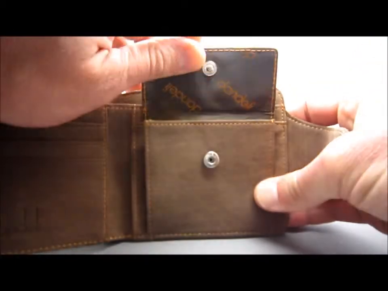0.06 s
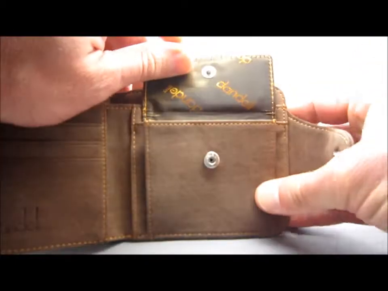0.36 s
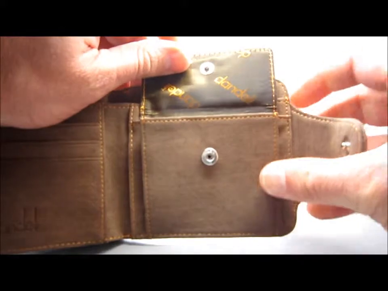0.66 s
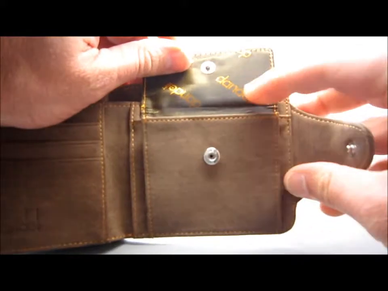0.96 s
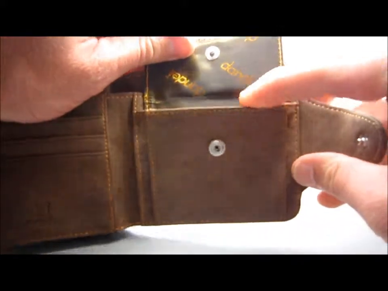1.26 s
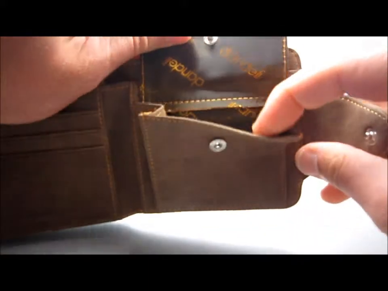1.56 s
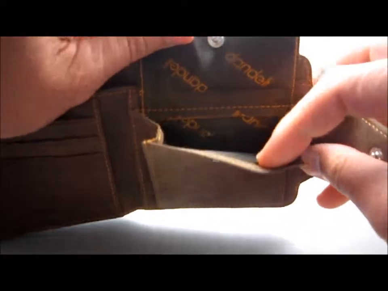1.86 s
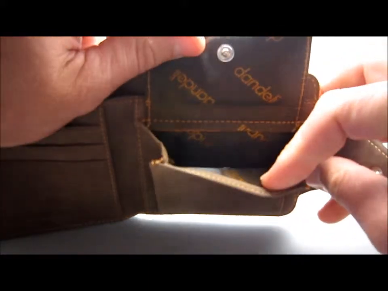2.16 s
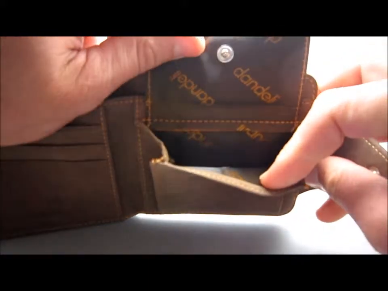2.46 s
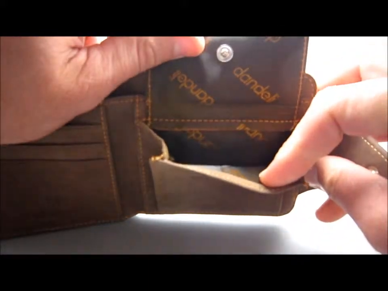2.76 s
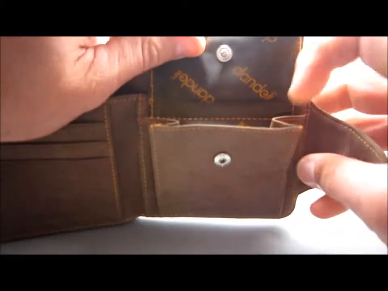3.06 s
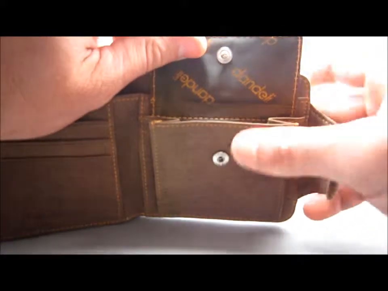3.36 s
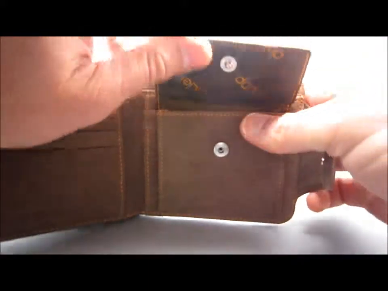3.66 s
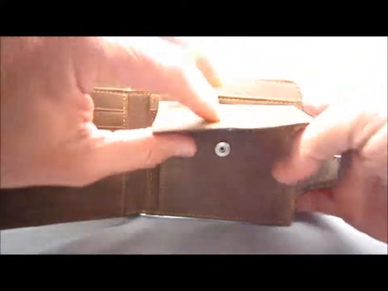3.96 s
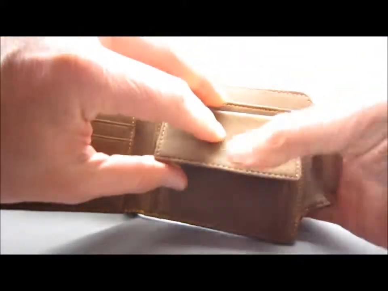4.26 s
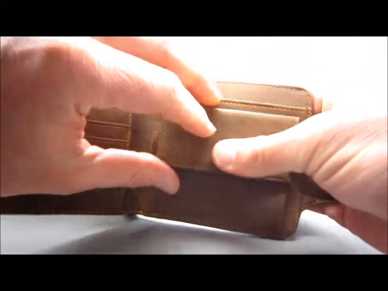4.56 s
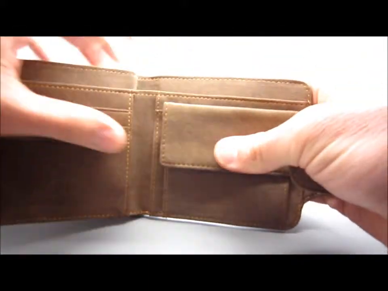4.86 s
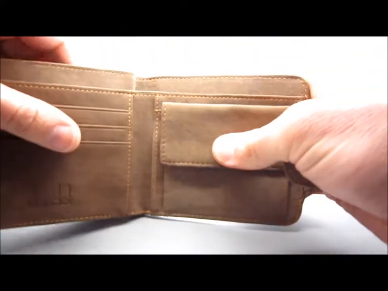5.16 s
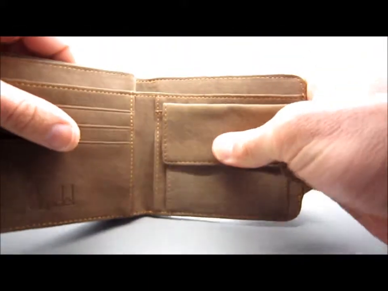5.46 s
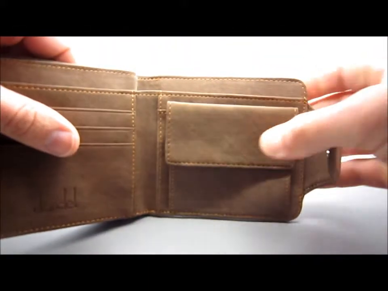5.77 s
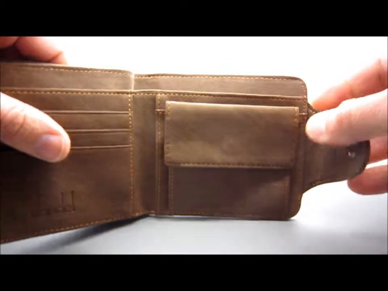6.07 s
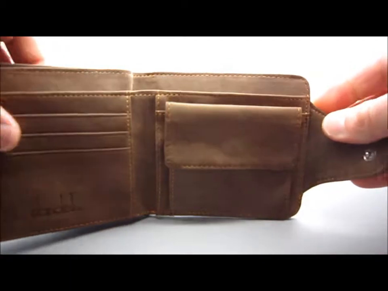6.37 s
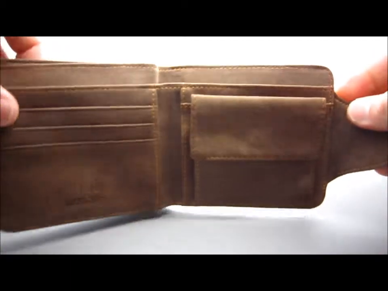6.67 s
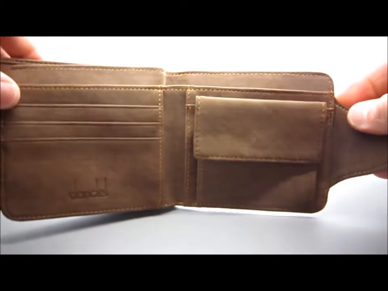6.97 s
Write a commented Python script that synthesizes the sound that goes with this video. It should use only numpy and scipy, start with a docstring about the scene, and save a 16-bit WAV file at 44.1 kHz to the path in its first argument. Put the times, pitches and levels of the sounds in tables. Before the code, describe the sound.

A leather wallet is handled close to a small microphone in a quiet room, over a faint steady hiss. Soft, hollow fingertip taps come at about 0.2 to 0.3 seconds, followed by short, quiet rubs and drags of skin on leather up to about 1.2 seconds. Around 1.5 seconds the coin pocket opens with a few bright ticks and faint crackles. Light creaks, ticks and rubs return near 2 seconds and from 2.9 to 3.5. Around 4 seconds the flap folds with more rubbing and a soft low rumble, and at 4.4 its press stud shuts with a small, bright metal click. Ticks and taps gather from 5 to 5.2 seconds. At 5.3 the tab's stud snaps shut, by far the loudest sound, briefly overloading the microphone with a short room tail. The level ducks and slowly recovers, with only faint rubs until about 7 seconds.

```python
"""A leather wallet, handled close to a small microphone over a table in a quiet room.
Fingers tap, slide and drag on it: skin catches on the grain and shakes the hollow body. Seams tick,
the coin pocket creaks open, the inner flap's press stud clicks shut, then the tab's stud snaps shut.
At this distance the snap overloads the microphone; the gain control ducks and slowly recovers."""
import sys
import numpy as np
from scipy import signal
from scipy.fft import rfft, irfft, next_fast_len
from scipy.io import wavfile

SR = 44100
rng = np.random.default_rng(int(sys.argv[2]) if len(sys.argv) > 2 else 0)


def unload_audio(sound):
    """Save the sound as a 16-bit wav file, at the path given as the first command line argument."""
    columns = np.transpose(np.atleast_2d(sound))
    # keep every value between -1 and 1, then stretch to whole-number steps
    steps = np.round(np.clip(columns, -1, 1) * 32767)
    wavfile.write(sys.argv[1], SR, steps.astype(np.int16))


N = 309571
TIME = np.arange(N) / SR

# colours of the background hiss, of skin on leather and of its airy top: (frequency [Hz], level [dB])
HISS_SPECTRUM = [(20, 3), (130, 1.5), (250, -2), (500, -5.5), (900, -11), (1400, -10.5), (2200, -13.5),
                 (3200, -17.5), (5000, -21.5), (7000, -25), (9000, -27), (11000, -25), (16000, -27.5)]
SKIN_SPECTRUM = [(200, 1), (700, 1.5), (1500, 1), (2500, 1.5), (3400, 4.5), (4600, 1), (5400, 0),
                 (6300, -2.5), (7500, -17.5), (10000, -22.5), (16000, -35)]
AIR_SPECTRUM = [(2000, -39.5), (6000, -7), (8500, -7.5), (11500, -7), (14000, -11.5), (16000, -9.5)]
# rumble of the grip shifting until the tab's stud is shut: (time [s], level [dB])
GRIP_RUMBLE = [(0.0, -71), (0.19, -68), (0.22, -52), (0.49, -58.5), (1.52, -55.5), (1.55, -62.5),
               (3.16, -63.5), (3.2, -50.5), (3.66, -62), (4.0, -41.5), (4.22, -59), (4.31, -46),
               (4.63, -64), (5.09, -58), (5.15, -58), (5.3, -50)]
# effort of the hands holding the wallet: (time [s], relative level [dB])
HOLD_EFFORT = [(0.0, -70.5), (0.46, -64.5), (0.78, -64.5), (1.36, -62.5), (2.63, -71.5), (4.0, -57),
               (4.37, -62.5), (5.18, -62.5), (5.3, -62)]
# resonances of the folded leather, hands and table: (frequency [Hz], width [Hz], gain [dB])
WALLET_MODES = [(34.95, 86, -7.5), (69, 12, 0.5), (119, 17, 4), (133.2, 13, 4), (178, 25, 2.5),
                (221, 16, 7.5), (259, 47.6, 4), (343, 190, -3.5), (843, 20, -9.5), (1017, 82, -7.5),
                (1137, 33, -5.5), (1550, 70, -15.5), (1580, 130, -16), (2040, 94, -7), (2250, 86, -21)]
# hollow ring of the coin pocket: (frequency [Hz], width [Hz], gain [dB])
POCKET_MODES = [(484, 20, 6), (615, 26, 3), (672, 24, 3)]
# soft fingertip taps: (time [s], peak level [dB], contact brightness [Hz])
FINGER_TAPS = [(.2140, -25, 2420), (0.2372, -28, 600), (.3220, -32.5, 2500), (.334, -33, 300),
               (1.859, -38, 2200), (3.492, -40.5, 2484), (4.286, -33.5, 500), (4.297, -37, 200),
               (4.4212, -30.5, 895), (4.805, -38.5, 1990), (5.008, -36, 155.7), (5.06, -20, 1690),
               (5.204, -26, 1996), (6.031, -43.5, 149)]
# seams, creases and a stud seeking its socket: (time [s], peak level [dB], pitch [Hz])
SEAM_TICKS = [(.2140, -34.5, 3100), (.324, -41, 3440), (1.0984, -41, 5000), (1.1042, -39, 4530),
              (1.4321, -37.5, 4500), (1.485, -29.5, 6070), (1.502, -26, 7800), (1.509, -31, 7600),
              (2.929, -34, 4380), (3.041, -31, 5300), (3.3385, -29.5, 5940), (3.408, -42, 1570),
              (3.4928, -38.5, 3500), (4.4553, -37, 5000), (4.602, -36.5, 2864), (4.688, -32.5, 3500),
              (4.809, -35.5, 2547), (4.846, -37.5, 4075), (4.9935, -33, 2205), (5.132, -25.5, 3320),
              (5.1615, -23.5, 1857), (5.221, -29.5, 2770)]
# strokes of skin on leather: (peak time [s], level [dB], length [s], air relative to level [dB])
SKIN_STROKES = [(.300, -54.5, 0.032, -1.5), (0.433, -53.5, 0.1, -26), (1.104, -39.5, 0.017, -10),
                (1.182, -50, 0.046, -29), (1.481, -50, .07, -18), (2.049, -57, 0.091, -20),
                (2.912, -56, 0.067, -11), (3.021, -46.5, 0.047, -7.5), (3.698, -58, 0.032, 2),
                (3.771, -54, 0.034, 11.5), (3.966, -60.5, 0.23, 1), (4.035, -47.5, 0.048, -20),
                (4.095, -42, 0.015, -11), (4.451, -52, 0.066, -14), (4.65, -54.5, 0.1, -16),
                (4.92, -62, 0.21, 4), (5.051, -53, .04, -4.5), (5.176, -55, 0.085, -13),
                (6.425, -60.5, 0.23, -5)]
# drags of fingers, and of the flap or tab rubbing at its edge, which sound thinner: (peak time [s], level [dB],
# length [s], low cut [Hz])
DRAGS = [(0.577, -45, 0.052, 316), (0.643, -57, 0.054, 248), (0.754, -53, 0.07, 254),
         (1.01, -58.5, 0.05, 300), (1.103, -49.5, 0.022, 655), (1.375, -61, 0.11, 120),
         (1.868, -49, 0.024, 343), (2.326, -54, 0.02, 487), (3.215, -38, 0.016, 380),
         (3.235, -56.5, 0.19, 250), (3.41, -50, 0.01, 200), (3.917, -47.5, 0.094, 230),
         (3.989, -41, 0.027, 110), (4.094, -54.5, 0.04, 120), (4.316, -54, .15, 95),
         (5.0, -45, 0.021, 244), (5.087, -51, 0.084, 120), (5.587, -48.5, 0.015, 100)]
# the pocket opens, spreads and closes, the flap is folded: (peak time [s], level [dB], length [s])
LEATHER_BENDS = [(1.485, -46, 0.48), (2.002, -50.5, 0.24), (3.006, -48.5, 0.24), (4.03, -60, .4),
                 (4.845, -49, 0.29)]
# the inner flap's press stud clicks shut: (time [s], peak level [dB])
INNER_CLICKS = [(4.4220, -14), (4.4248, -16.5)]
# the tab's stud snaps shut, followed by a faint, close echo: (time [s], peak level [dB])
TAB_SNAP = [(5.3275, 15), (5.3328, -15)]
# ring of the inner stud and of the tab's stud: (frequency [Hz], width [Hz], gain [dB])
INNER_STUD_MODES = [(2320, 300, -10), (3080, 180, -5), (3510, 190, 0), (3800, 92, 4), (4050, 140, 8),
                    (4490, 100, 15.5), (5100, 220, 5), (5960, 110, -4), (6550, 180, 7), (6750, 97, -16),
                    (9300, 120, -41), (11400, 2500, -36)]
TAB_STUD_MODES = [(301.4, 51, -4), (695, 100, -15.5), (875, 72, -3.5), (1316, 99, 3.5), (1550, 120, 2),
                  (2154, 170, 6.5), (2447, 130, 3), (2900, 34, -2.5), (3397, 250, -4.5), (4226, 240, -1.5),
                  (4900, 110, -15.5), (5807, 270, -7), (6340, 680, -11), (6640, 300, -16.5),
                  (9030, 250, -14), (10100, 250, -17), (11280, 300, -17), (13400, 650, -18.5)]
# echoes off surfaces close to the microphone: (delay [s], level [dB])
NEAR_ECHOES = [(.0009, -26.5), (.0021, -22), (.0034, -13.5), (.0055, -17)]


def from_db(db):
    """Decibels to gain."""
    return 10 ** (np.asarray(db) / 20)


def rms_one(x):
    """Scale to unit rms."""
    return x / np.sqrt(np.mean(x ** 2) + 1e-20)


def peak_one(x):
    """Scale to unit peak."""
    return x / np.max(np.abs(x))


def butter(x, hz, kind, order=2):
    """Causal Butterworth filter."""
    sections = signal.butter(order, np.clip(hz, 10, .45 * SR), kind, fs=SR, output="sos")
    return signal.sosfilt(sections, x)


def coloured(x, spectrum):
    """Give a noise a smooth spectrum, at unit rms."""
    hz, db = np.transpose(spectrum)
    size = next_fast_len(len(x))
    bins_hz = np.maximum(np.fft.rfftfreq(size, 1 / SR), 1)
    gain = from_db(np.interp(np.log(bins_hz), np.log(hz), db))
    return rms_one(irfft(rfft(x, size) * gain, size)[:len(x)])


def resonate(x, modes):
    """Parallel resonances, each with its own peak gain."""
    out = 0
    for hz, width, db in modes:
        r = np.exp(-np.pi * width / SR)
        feedback = [1, -2 * r * np.cos(2 * np.pi * hz / SR), r * r]
        out = out + from_db(db) * (1 - r * r) / 2 * signal.lfilter([1, 0, -1], feedback, x)
    return out


def add(track, s, sound):
    """Mix a sound into the track at s seconds."""
    start = int(s * SR)
    track[start:start + len(sound)] += sound[:N - start]


def impulse(size=8192):
    """A single unit push."""
    return np.r_[1.0, np.zeros(size - 1)]


def wander(per_s):
    """Slow random drift of about unit spread."""
    steps = rng.standard_normal(1024)
    return np.interp(TIME * per_s, np.arange(len(steps)), steps)


def swell(s, db, length, rise_share):
    """Power of one stroke: it gathers speed, peaks at s seconds and slows again."""
    from_peak = (TIME - s) / (length * np.where(TIME < s, rise_share, 1 - rise_share))
    return from_db(db) ** 2 * np.exp(-np.minimum(from_peak ** 2, 60))


def slips(per_s, spread_db):
    """Random tiny slips of uneven size and sign."""
    sizes = from_db(spread_db * np.minimum(rng.exponential(1, N), 4)) * rng.choice([-1, 1], N)
    return sizes * (rng.random(N) < per_s / SR)


def contact(t60_s, scatter, size=8192):
    """A push followed by a dying scatter of smaller touches."""
    push = scatter * rng.standard_normal(size) * from_db(-60 * TIME[:size] / t60_s)
    push[0] += 1
    return push


def hiss(level_db=-60):
    """The faint, steady background of the quiet room."""
    return from_db(level_db) * coloured(rng.standard_normal(N), HISS_SPECTRUM)


def gripping(trim_db=.5, let_go_db_per_s=249):
    """The hands shift their hold and wake only the lowest resonances, which die as the grip relaxes."""
    s, db = np.transpose(GRIP_RUMBLE)
    shifts = butter(slips(per_s=1600, spread_db=2.5), 110, "low")
    rumble = rms_one(resonate(shifts, WALLET_MODES))
    relaxed_db = let_go_db_per_s * np.maximum(TIME - s[-1], 0)
    return from_db(trim_db + np.interp(TIME, s, db) - relaxed_db) * rumble


def holding(level_db, rest_db, swing=1.1, uneven_db=3):
    """Gain of the holding hands' faint rub: it follows their effort unevenly, then settles at the snap."""
    s, db = np.transpose(HOLD_EFFORT)
    effort_db = np.interp(TIME, s, swing * (db - db.mean()), right=rest_db)
    return from_db(level_db + effort_db + uneven_db * wander(per_s=18))


def tapping():
    """The softer the fingertip lands, the fewer high resonances it wakes."""
    out = np.zeros(N)
    for s, db, bright_hz in FINGER_TAPS:
        push = butter(contact(t60_s=.06, scatter=.057), bright_hz, "low")
        add(out, s, from_db(db) * peak_one(resonate(push, WALLET_MODES + POCKET_MODES)))
    return out


def ticking():
    """Seams, creases and stud give short, broad ticks; the brighter ones die sooner."""
    out = np.zeros(N)
    for s, db, hz in SEAM_TICKS:
        push = contact(t60_s=.02 * (hz / 4000) ** -.5, scatter=.14)
        tick = butter(push, [hz / 4.1, hz * 1.39], "band")
        add(out, s, from_db(db) * peak_one(tick))
    return out


def sliding(rasp_hz=4550, rasp_wander=.15):
    """Fine leather grain catches under the skin in clumps and rasps, with an airy top heard close up."""
    power = holding(level_db=-63, rest_db=-5.5) ** 2
    air_power = power * from_db(-10) ** 2
    for s, db, length, air_db in SKIN_STROKES:
        stroke = swell(s, db, length, rise_share=.59)
        power += stroke
        air_power += stroke * from_db(air_db) ** 2
    clumps = from_db(1.9 * rms_one(butter(rng.standard_normal(N), 120, "low")))
    grain = slips(per_s=5600, spread_db=1) * clumps
    rasp_cycles = np.cumsum(rasp_hz * (1 + rasp_wander * wander(per_s=6))) / SR
    rasp = rms_one(butter(grain, 580, "low") * np.cos(2 * np.pi * rasp_cycles))
    friction = from_db(-2.5) * coloured(grain, SKIN_SPECTRUM) + from_db(-12.5) * rasp
    air = from_db(-2.55) * coloured(grain, AIR_SPECTRUM)
    return np.sqrt(power) * friction + np.sqrt(air_power) * air


def dragging(hollow_db=3, flap_down_s=3.8):
    """Coarse stick and slip shakes the wallet, which rings more hollow until the flap covers the pocket."""
    body = resonate(impulse(), WALLET_MODES)
    pocket = resonate(impulse(), POCKET_MODES)
    shut = butter(body + pocket, 2000, "low", order=4)
    hollow = butter(body + from_db(hollow_db) * pocket, 2000, "low", order=4)
    grain = rms_one(slips(per_s=4000, spread_db=-1))
    hand_rub = rms_one(butter(signal.fftconvolve(grain, shut)[:N], 180, "high"))
    out = holding(level_db=-69, rest_db=-12) * hand_rub
    for s, db, length, low_cut_hz in DRAGS:
        during = slice(max(int((s - 2 * length) * SR), 0), int((s + 2 * length) * SR))
        ring = butter(hollow if s < flap_down_s else shut, low_cut_hz, "high", order=3)
        stroke = np.sqrt(swell(s, db, length, rise_share=.43)) * grain
        add(out, during.start / SR, signal.fftconvolve(stroke[during], ring / np.linalg.norm(ring)))
    return out


def creaking():
    """Faint, bright crackles wherever the leather bends."""
    power = sum(swell(s, db, length, rise_share=.56) for s, db, length in LEATHER_BENDS)
    crackles = slips(per_s=53, spread_db=3) * np.sqrt(power)
    click = peak_one(butter(impulse(), [2800, 15000], "band"))
    return signal.fftconvolve(crackles, click)[:N]


def press_stud(hits, modes, scatter, hardness_hz):
    """Metal meets metal; the leather around it damps the ring within a few hundredths of a second."""
    out = np.zeros(N)
    for s, db in hits:
        push = butter(contact(t60_s=.027, scatter=scatter), hardness_hz, "low")
        add(out, s, from_db(db) * peak_one(resonate(push, modes)))
    return out


def stud_crack(boost_db=4):
    """The snap's first crack sprays into the room, broader than the ring that reaches the microphone."""
    out = np.zeros(N)
    s, db = TAB_SNAP[0]
    push = butter(impulse(), 3100, "low", order=1)
    crack = butter(push, 600, "high", order=1)
    add(out, s, from_db(db + boost_db) * peak_one(crack))
    return out


def reflected(x):
    """Nearby surfaces return the sound a few milliseconds late and comb its spectrum."""
    out = x.copy()
    for delay_s, db in NEAR_ECHOES:
        add(out, delay_s, from_db(db) * x)
    return out


def room(x, near_t60_s=.16, far_t60_s=.52, size=32768):
    """Bright, quick reflections from around the table, then a dull room tail with a faint boom."""
    t = TIME[:size]
    near_decay = from_db(-60 * t / near_t60_s) * (t > .003)
    far_decay = from_db(-60 * t / far_t60_s) * (t > .012)
    near = butter(rng.standard_normal(size), 9000, "low", order=1) * near_decay
    far = butter(butter(rng.standard_normal(size), 2000, "low"), 1150, "high") * far_decay
    boom = butter(rng.standard_normal(size), [100, 650], "band") * far_decay
    echoes = from_db(-19) * rms_one(near) + from_db(-24.5) * rms_one(far) + from_db(-33) * rms_one(boom)
    return signal.fftconvolve(x, echoes / np.sqrt(size))[:N]


def scene():
    """One microphone position: the wallet close up, the room and its hiss well behind."""
    leather = reflected(sliding() + ticking() + creaking()) + dragging() + tapping() + gripping()
    handling = leather + press_stud(INNER_CLICKS, INNER_STUD_MODES, scatter=.025, hardness_hz=6100)
    snap = press_stud(TAB_SNAP, TAB_STUD_MODES, scatter=.015, hardness_hz=10500)
    into_room = handling + from_db(-14.5) * snap + stud_crack()
    return (handling + snap + room(into_room) + hiss())[None]


def gain_control(x, threshold_db=-11.5, depth_db=15.5, release_db_per_s=11, attack_s=.0099):
    """An overload pulls the gain down quickly; it creeps back at a steady rate."""
    over = np.clip(np.abs(x) / from_db(threshold_db) - 1, 0, 1)
    recovery_db = release_db_per_s * TIME
    cut_db = np.maximum.accumulate(depth_db * over + recovery_db, axis=-1) - recovery_db
    lag = np.exp(-1 / (attack_s * SR))
    return x * from_db(-signal.lfilter([1 - lag], [1, -lag], cut_db))


def record(dry, notch_hz=7880, notch_width_hz=1700, ceiling=.62, cutoff_hz=16900):
    """The small microphone has a deep treble notch; the gain ducks, peaks flatten and the top is cut."""
    notched = signal.lfilter(*signal.iirnotch(notch_hz, notch_hz / notch_width_hz, fs=SR), dry)
    ducked = gain_control(notched)
    flattened = ducked / (1 + (ducked / ceiling) ** 4) ** (1 / 4)
    return signal.sosfilt(signal.cheby2(14, 70, cutoff_hz, fs=SR, output="sos"), flattened)


dry = scene()
out = record(dry)
unload_audio(out)
```